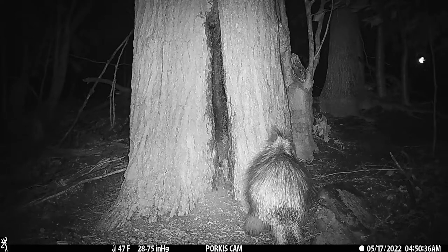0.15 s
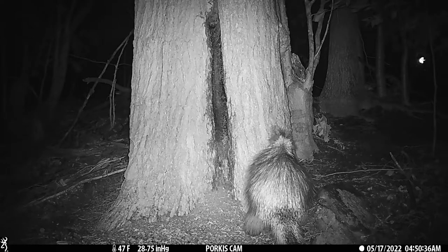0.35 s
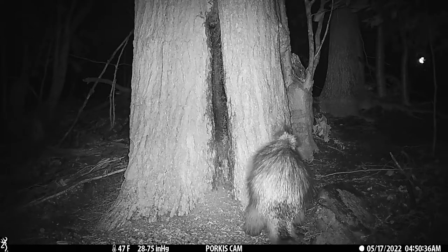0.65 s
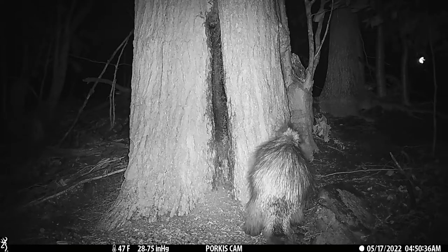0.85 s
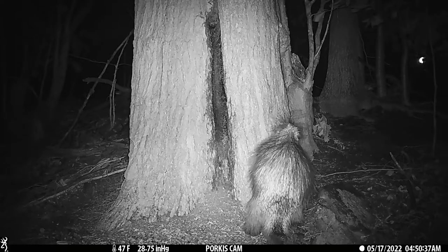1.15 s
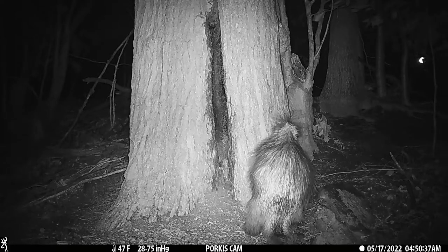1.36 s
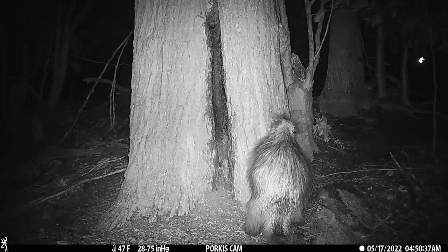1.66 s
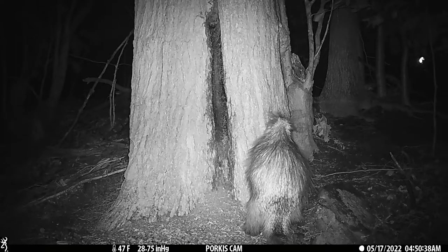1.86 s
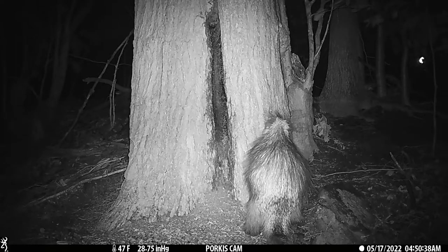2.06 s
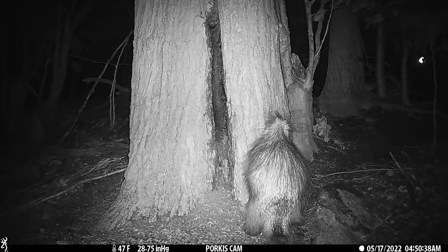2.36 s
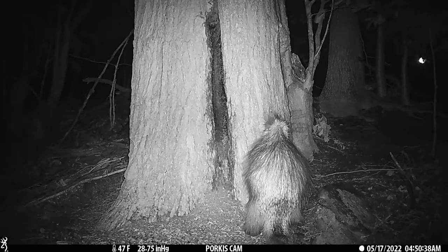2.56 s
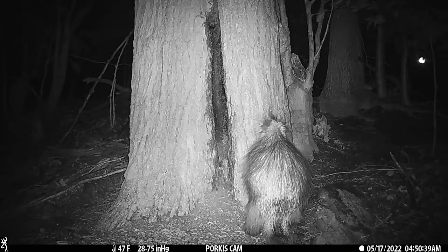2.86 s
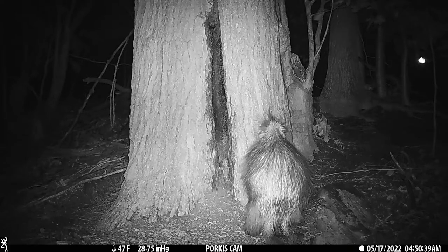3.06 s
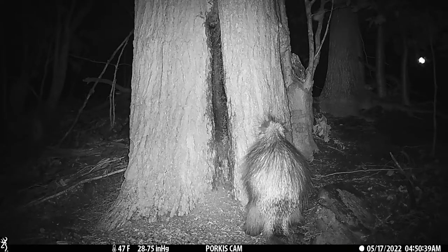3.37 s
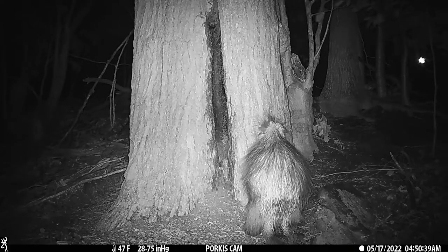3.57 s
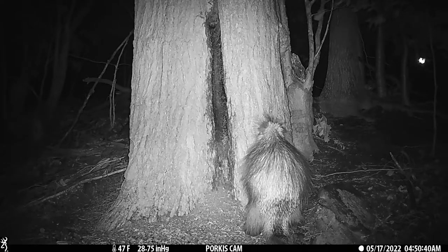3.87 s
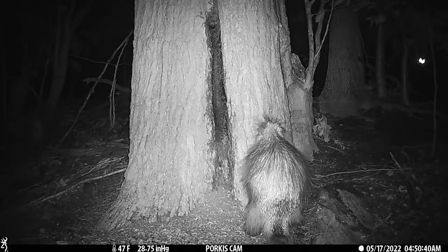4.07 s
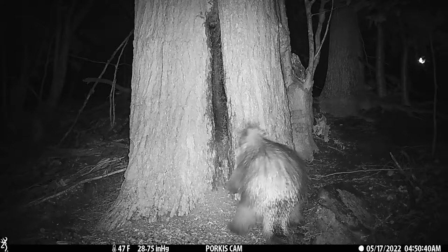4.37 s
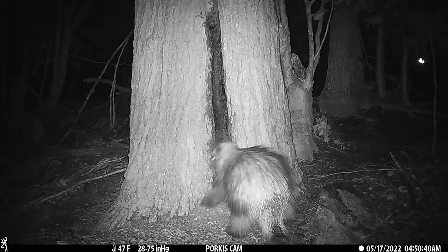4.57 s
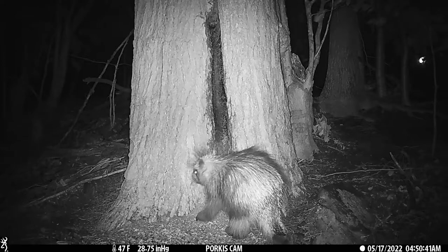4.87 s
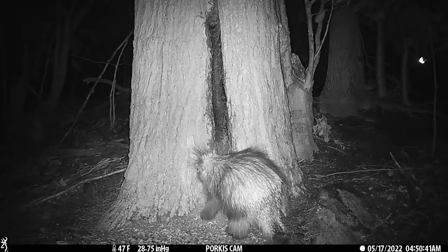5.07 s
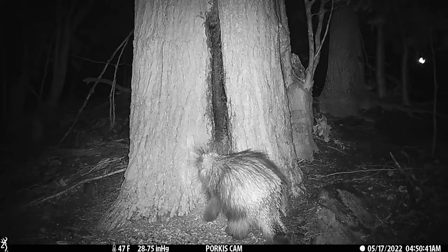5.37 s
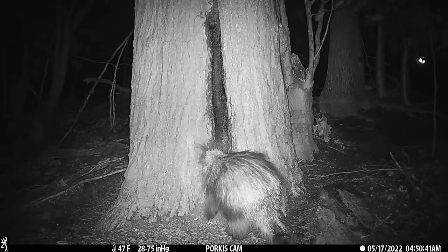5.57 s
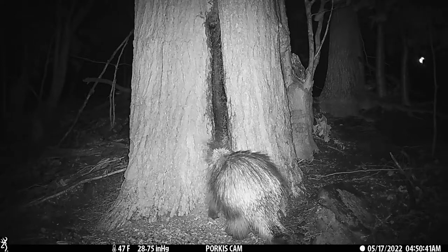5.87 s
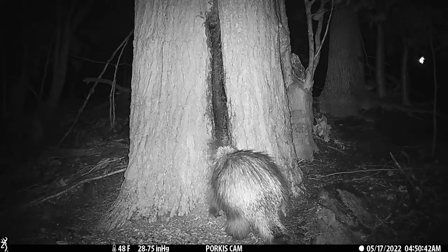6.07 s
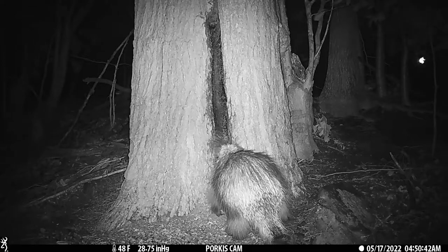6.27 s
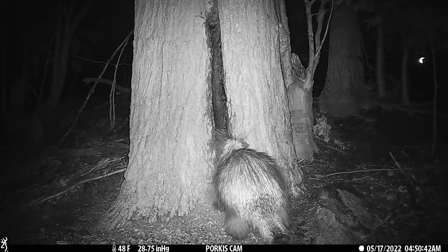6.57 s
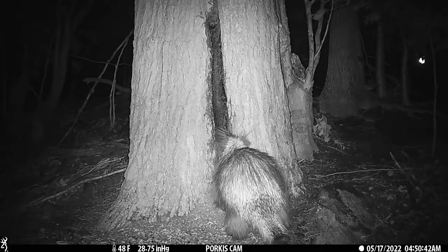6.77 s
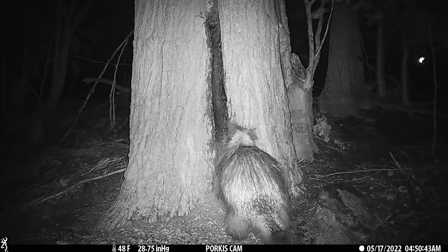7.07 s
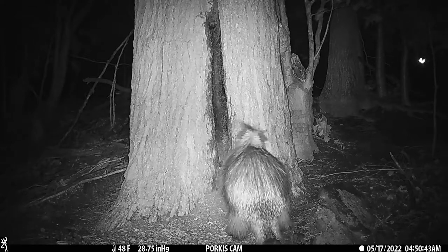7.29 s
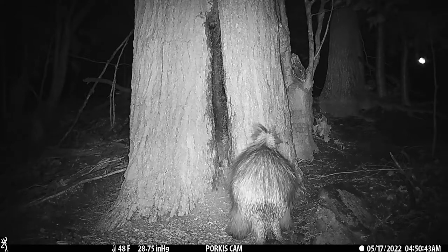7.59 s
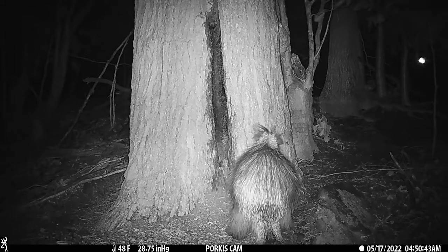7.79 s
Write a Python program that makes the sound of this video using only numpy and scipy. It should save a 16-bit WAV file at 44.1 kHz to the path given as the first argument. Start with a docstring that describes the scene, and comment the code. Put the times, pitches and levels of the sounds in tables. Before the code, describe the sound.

Repeated plaintive whining cries from a porcupine at a tree, each dropping in pitch, with camera hiss, faint whine and late wind buffeting.

```python
"""Porcupine cries at night

A porcupine whines nine times at the foot of a tree, a few metres from a trail camera. Most cries hold near
1 kHz, then slide down: harmonics of the vocal folds weighed by nose, throat and mouth, plus a chest hum.
Trunks return them as sparse decaying echoes. The camera adds shaped hiss, a jittering oscillator with locked
overtones and a gated tone. Wind is gusting low noise, with brief pressure pulses near the end."""
import sys
import numpy as np
from scipy import signal
from scipy.fft import rfft, irfft
from scipy.io import wavfile
from scipy.ndimage import uniform_filter1d

SR = 44100
rng = np.random.default_rng(int(sys.argv[2]) if len(sys.argv) > 2 else 0)


def output_pcm(signal):
    """Save a mono or channel-first signal as 16-bit PCM at the path in sys.argv[1].

    Samples are clipped to [-1, 1] before scaling.
    """
    pcm = np.clip(np.atleast_2d(signal).T, -1, 1) * 32767
    wavfile.write(sys.argv[1], SR, np.round(pcm).astype(np.int16))


N = 349713


def gain(db):
    """Logarithmic level: 20 dB is a factor of ten in amplitude."""
    return 10 ** (np.asarray(db) / 20)


def unit_rms(x):
    """Normalization of mean power: scales a signal to rms 1."""
    return x / np.sqrt(np.mean(x ** 2) + 1e-20)


def read_spectrum(points, hz, column=1):
    """Interpolation of a table along a logarithmic frequency axis."""
    table = np.transpose(points)
    return np.interp(np.log(hz + 1), np.log(table[0] + 1), table[column])


def wander(n, low_hz, high_hz, order=1):
    """Band-shaped random fluctuation of rms 1: peaks somewhat above low_hz, stops at high_hz."""
    hz = np.fft.rfftfreq(n + SR, 1 / SR)
    slope = hz / (hz ** 2 + low_hz ** 2) ** 0.76
    spectrum = rfft(rng.standard_normal(n + SR)) * (hz < high_hz) * slope ** order
    return unit_rms(irfft(spectrum, n + SR)[:n])


def add(mix, s, sound):
    """Superposition: adds a sound to the mix from time s."""
    part = mix[round(s * SR):][:len(sound)]
    part += sound[:len(part)]


# Spectral density of the hiss: f/Hz, relative level/dB per Hz
HISS_SPECTRUM = [(20, -7.5), (150, -12.5), (400, -4.5), (1000, -1), (2000, -4.5), (3200, -3.5), (5000, -2),
                 (6200, -11.5), (8200, -18), (10500, -23), (11000, -32.5), (11600, -22.5), (13200, -28.5),
                 (15700, -29)]
HISS_DB = -57.5  # rms


def hiss():
    """Filtered white noise: the smooth noise of night air and preamplifier."""
    spectrum = rfft(rng.standard_normal(N))
    spectrum *= gain(read_spectrum(HISS_SPECTRUM, np.fft.rfftfreq(N, 1 / SR)))
    return gain(HISS_DB) * unit_rms(irfft(spectrum, N))


# Slow drift of the oscillator, to which jitter is added: t/s, f/Hz
WHINE_DRIFT = [(0.0, 3780), (0.3, 3800), (0.62, 3770), (0.9, 3810), (1.06, 3650), (1.2, 3730), (1.6, 3675),
               (1.97, 3704), (2.24, 3574), (2.66, 3760), (2.96, 3590), (3.33, 3800), (3.86, 3630),
               (4.0, 3700), (4.19, 3630), (4.37, 3820), (4.72, 3470), (5.0, 3844), (5.4, 3905),
               (5.88, 3790), (6.34, 3894), (6.82, 3720), (7.22, 3850), (7.402, 3710), (7.93, 3920)]
# Overtones before the treble limit: multiple of the pitch, rms level/dB
WHINE_OVERTONES = [(1, -59), (2, -68.5), (4, -87)]
SLOW_JITTER, FAST_JITTER = 0.0118, 0.015  # rms shares of the pitch
WHINE_TOP_HZ = 14800  # overtones fade steeply above this


def whine():
    """Frequency modulation: an unsteady camera oscillator whose overtones stay phase-locked."""
    s, drift_hz = np.transpose(WHINE_DRIFT)
    jitter = SLOW_JITTER * wander(N, 4.92, 14) + FAST_JITTER * wander(N, 11.2, 300)
    hz = np.interp(np.arange(N) / SR, s, drift_hz) * (1 + jitter)
    turns = np.cumsum(hz) / SR
    tone = np.zeros(N)
    for k, db in WHINE_OVERTONES:
        partial = gain(db) * np.sqrt(2) * np.sin(2 * np.pi * k * turns)
        tone += partial / (1 + (k * hz / WHINE_TOP_HZ) ** 40)
    return tone * gain(0.4 * wander(N, 7.8, 220))


THROB_RATE_HZ, THROB_HZ, THROB_PEAK_DB = 19.986, 2515, -61  # the peak level fluctuates slightly


def throb():
    """Amplitude gating: a tone sounds for about 60 % of each 50 ms, gliding mostly upwards."""
    beat = 2 * np.pi * THROB_RATE_HZ * (np.arange(N) / SR - .0405)
    gate = np.clip(.7 + 2.2 * np.cos(beat), 0, 1)
    hz = THROB_HZ + 22 * np.sin(beat) + 32 * wander(N, 12, 50)
    fluctuation = gain(.8 * wander(N, 3, 40))
    return gain(THROB_PEAK_DB) * fluctuation * gate * np.sin(2 * np.pi * np.cumsum(hz) / SR)


# Gusts, exponential on both sides of the peak: t/s, rms level/dB, rise/s, fall/s
WIND_GUSTS = [(0.11, -63, .04, .04), (0.64, -79, .2, .04), (2.23, -79, .04, 0.13), (3.75, -76, .1, .05),
              (4.09, -73, 0.045, .1), (4.55, -74, .15, 0.039), (5.17, -63, .15, 0.05),
              (5.61, -64, 0.14, 0.17), (5.92, -60.5, 0.035, 0.21), (6.29, -65, .06, 0.54),
              (6.89, -65, .1, 0.056), (7.07, -60, 0.024, 0.047), (7.35, -55.5, 0.055, 0.18),
              (7.75, -58, 0.036, .1)]
# Pressure pulses: onset t/s, level/dB at the pulse centre, length scale/ms
WIND_PUFFS = [(7.06, -69, 0.97), (7.077, -62, 1.3), (7.189, -52, 2.3), (7.2, -49, 2.9), (7.216, -54, 3.4),
              (7.264, -54, 1.8), (7.287, -49, 1.9), (7.325, -53, 1.15), (7.332, -41, 1.8), (7.35, -49, 3.5),
              (7.357, -52, 2.2), (7.406, -41, 1.5), (7.415, -43, 2.1), (7.521, -52, 1.8)]
CALM_DB = -89.5  # rms, beneath the gusts


def wind():
    """Turbulent pressure: lumpy rumble swells with gusts, and eddies strike the port as puffs."""
    t = np.arange(N) / SR
    level = gain(CALM_DB)
    for s, db, rise, fall in WIND_GUSTS:
        level = level + gain(db) * np.exp(-abs(t - s) / np.where(t < s, rise, fall))
    rumble = wander(N, 26.7, 400, order=3)
    lumps = gain(4.45 * wander(N, 12.0, 30))
    out = level * unit_rms(rumble * lumps)
    ms_from_centre = np.arange(-600, 600) / SR * 1000
    signs = rng.choice([-1, 1], len(WIND_PUFFS))
    for (s, db, ms), sign in zip(WIND_PUFFS, signs):
        v = ms_from_centre / ms
        pulse = (1 - 3 * v - 4 * v ** 2) * np.exp(-4 * v ** 2)
        # the centre comes half a length after the onset
        add(out, s - 600 / SR + ms / 2000, sign * gain(db) * pulse)
    return out


def echoes(x, table):
    """Reverberant decay: sparse reflections of random sign, each band with its own decay time."""
    taps = np.zeros(SR // 2)
    at = np.arange(130, len(taps) - 22, 22)  # from 3 ms on, one reflection in each 0.5 ms
    taps[at + rng.integers(0, 22, len(at))] = rng.choice([-1., 1.], len(at))
    hz, t, z = signal.stft(taps, SR, nperseg=128)
    z = z * gain(-60 * t / read_spectrum(table, hz)[:, None])
    band_gain = gain(read_spectrum(table, hz, column=2))[:, None]
    tail = signal.istft(z * band_gain, SR, nperseg=128)[1]
    flat_tail = signal.istft(z, SR, nperseg=128)[1]
    return signal.fftconvolve(x, tail / np.linalg.norm(flat_tail))[:N]


# Reflections off the near trunk: f/Hz, decay time for 60 dB/s, level against the direct sound/dB
TRUNK_ECHOES = [(1500, .07, -18), (2500, .08, -8), (3500, .09, -2), (6000, .08, -2)]
# Reflections off the farther trees: f/Hz, decay time for 60 dB/s, level against the direct sound/dB
WOODS_ECHOES = [(506, 0.3, -4.5), (1730, 0.34, -10), (2710, 0.59, -8), (5300, 0.53, -4.5), (8100, 0.25, -2)]


def woods(x):
    """Reflection: the animal faces the near trunk, whose bark returns treble; farther trees add the tail."""
    return echoes(x, TRUNK_ECHOES) + echoes(x, WOODS_ECHOES)


def resonances(modes, hz, factor=1):
    """Resonance: power passed at hz by steep-skirted modes, their centres shifted by a factor."""
    power = 0
    for f, width, db in modes:
        power = power + gain(2 * db) / (1 + (2 * (hz - f * factor) / width) ** 2) ** 2.015
    return power


# Contours, one table a cry: t/s, effort level/dB, f/Hz, mouth level against the nose/dB
CRY_CONTOURS = [
    [(0.0, -40, 874, 5), (0.032, -37, 753, -2), (0.06, -43.5, 584, 2.5), (0.092, -42.5, 393, -4),
     (0.108, -77, 320, 5)],
    [(0.605, -62, 763, -14), (0.625, -55, 880, -18), (0.657, -55.5, 960, -6), (0.697, -50, 970, -4),
     (0.781, -40.5, 869, -0.5), (0.853, -40.5, 561, 1), (0.885, -41, 554, -7), (0.903, -39, 514.6, -3.5),
     (0.925, -44.5, 448, -1), (0.945, -45, 368, -7), (0.969, -70, 310, 3)],
    [(1.515, -62, 782, -8), (1.543, -56, 920, -10), (1.585, -52, 990, -5), (1.667, -45.5, 926, -1.5),
     (1.747, -40.5, 891, 1.5), (1.783, -38, 775, -1.5), (1.819, -41.5, 535, -1), (1.839, -37.5, 484, -7.5),
     (1.867, -61, 375, 5)],
    [(2.35, -70, 820, -5), (2.37, -53, 880, -13), (2.39, -57, 982, -1), (2.418, -48.5, 1026, -13.5),
     (2.55, -40.5, 1034, 0), (2.622, -38.5, 985, 2), (2.658, -34.5, 795, 0), (2.702, -38.5, 468, -4.5),
     (2.726, -40.5, 410, -2), (2.758, -68, 310, 2)],
    [(3.24, -64, 905, -11), (3.272, -52, 1022, -10), (3.308, -45, 1066, 2.5), (3.444, -39.5, 1063, 2),
     (3.52, -35, 932, -5.5), (3.54, -30.5, 876, -3.5), (3.568, -35.5, 750, 3), (3.604, -37, 490, -6),
     (3.632, -40, 410, -1), (3.676, -40.5, 424, -2.5), (3.74, -41, 369, -6), (3.784, -56.5, 295, -10)],
    [(4.345, -66, 913, 4), (4.372, -57, 993, 5), (4.384, -48.5, 1020, -9), (4.412, -48, 1045, -2),
     (4.524, -41, 1000, 9.5), (4.616, -36.5, 865, -1.5), (4.652, -38.5, 683, 2.5), (4.668, -37, 530, -8),
     (4.688, -43, 405, 0), (4.72, -58, 300, -5)],
    [(5.22, -55, 785, -7), (5.256, -55.5, 937, -9), (5.328, -47, 919, 0.5), (5.388, -41, 868, 1.5),
     (5.448, -39, 770, 0.5), (5.486, -42.5, 655, -2), (5.53, -43, 694.4, -1), (5.576, -41, 587, 1.5),
     (5.624, -39, 514, -2), (5.668, -51, 340, -6)],
    [(6.19, -60, 745, 1), (6.215, -54, 885, 0), (6.25, -57, 979, -7), (6.306, -47, 996, 2.5),
     (6.406, -43.5, 961, 0.5), (6.478, -44, 968, 4), (6.514, -38, 954, 3.5), (6.566, -40.5, 868, 3.5),
     (6.586, -35, 741, -3), (6.602, -43.5, 620, 2)],
    [(7.155, -52, 788, -6), (7.183, -54.5, 970, 6), (7.215, -50.5, 1063, -9), (7.25, -40, 1088, 14.5),
     (7.379, -35, 1103, 8.5), (7.463, -37.5, 1042, 8.5), (7.495, -34, 971, 3), (7.515, -28, 871, -7.5),
     (7.551, -37, 765, 9.5), (7.579, -38.5, 609, 1.5), (7.603, -46, 440, 1)],
]
# How each cry is held: chest hum level/dB at middle effort, hum flutter/dB,
# throat level against the mouth/dB, throat shift and mouth shift as factors
CRY_POSES = [(-61.5, 2.5, 0.5, 0.97, 1.1), (-58.5, 2, -1.5, 1.03, 1.07), (-60, 2, -2.5, 1.05, 1.056),
             (-58, 1, -1.5, 1.04, 1.057), (-56.5, -0.5, 1, 1.028, 1.044), (-57.5, 1, 1, 1.003, 1.034),
             (-61.5, 4.5, 0, 1.055, 1.09), (-63.5, 3, -3, 0.96, 1), (-58, 0.5, -2, 0.996, 1.01)]
# Resonances, with relative peak level: f/Hz, width 6 dB down/Hz, level/dB
NOSE_MODES = [(1140, 400, -41), (1608, 418, 7.5), (2220, 340, -3.5)]
THROAT_MODES = [(3614, 806, 0.5), (4235, 270, -6.5)]
MOUTH_MODES = [(4700, 910, -4.5), (5504, 1150, -5), (9070, 1800, -29.5)]
# Transmission of the body wall: f/Hz, level/dB
CHEST_WALL = [(300, -3), (450, -7), (650, 0), (850, -3.5), (1050, 2)]
SLACK_THROAT_DB, SLACK_OPENING = 2, 1.003  # every cry relaxes to this pose as the pitch drops
HUM_FOLLOW, MID_EFFORT_DB = 0.2, -43  # dB of hum per dB of effort, about this effort
HUM_RISE_S = 0.048  # the chest joins in after the voice


def cry(rows, pose):
    """Source and filter: harmonics of the folds slide through the resonances of nose, throat and mouth."""
    s, *columns = np.transpose(rows)
    t = np.arange(s[0], s[-1] + .005, 1 / SR)
    effort_db, hz, mouth_db = (
        uniform_filter1d(np.interp(t, s, c), size=400, mode="nearest") for c in columns)
    slack = np.clip((930 - hz) / 300, 0, 1)  # folds slacken as the pitch drops
    held_hum_db, flutter_db, held_throat_db, *held_shifts = pose
    hum_db = held_hum_db + HUM_FOLLOW * (effort_db - MID_EFFORT_DB) + read_spectrum(CHEST_WALL, hz)
    throat_db = mouth_db + held_throat_db + slack * (SLACK_THROAT_DB - held_throat_db)
    throat_shift, mouth_shift = (held + slack * (SLACK_OPENING - held) for held in held_shifts)

    # slack folds swing less evenly
    jitter = (.0015 + .005 * slack) * wander(len(t), 40, 400)
    turns = np.cumsum(hz * (1 + jitter)) / SR
    k = np.arange(2, 34)[:, None]
    partial_hz = k * hz
    power = resonances(NOSE_MODES, partial_hz)
    power += gain(2 * throat_db) * resonances(THROAT_MODES, partial_hz, throat_shift)
    power += gain(2 * mouth_db) * resonances(MOUTH_MODES, partial_hz, mouth_shift)
    power /= 1 + (partial_hz / 9800) ** 16  # steep fall above 9.8 kHz
    height = np.sqrt(2 * power / power.sum(axis=0))

    # five independent swells shared among the partials, deeper in the upper ones
    group = k[:, 0] % 5
    swells = np.array([wander(len(t), 8, 45) for _ in range(5)])[group]
    depth_db = .5 + 2.0 * np.clip(partial_hz / 4000, 0, 1) ** 2
    # slack folds leak air and the upper partials turn to rasp
    hoarse = np.array([wander(len(t), 90, 400) for _ in range(5)])[group]
    leak = .38 * slack * np.clip((partial_hz - 1800) / 1700, 0, 1)
    breathy = np.sqrt(1 - leak ** 2) + leak * hoarse
    waves = np.cos(2 * np.pi * k * turns - .3 * k ** 2)
    voice = (height * gain(depth_db * swells) * breathy * waves).sum(axis=0)

    # the fundamental leaves through the body wall
    hum = gain(hum_db + flutter_db * swells[0]) * np.sqrt(2) * np.cos(2 * np.pi * turns)
    under_way = s[0] == 0  # the first cry has already begun
    hum *= np.clip((t - s[0]) / HUM_RISE_S + under_way, 0, 1) ** 2
    rise = (t - s[0]) / 0.0045 + under_way
    fall = (t[-1] - t) / 0.0062
    return s[0], (gain(effort_db) * voice + hum) * np.clip(np.minimum(rise, fall), 0, 1)


def scene():
    """Superposition at one microphone, given on two equal channels."""
    animal = np.zeros(N)
    for rows, pose in zip(CRY_CONTOURS, CRY_POSES):
        add(animal, *cry(rows, pose))
    background = hiss() + whine() + throb() + wind()
    mono = gain(-1.15) * (animal + woods(animal)) + background
    return np.array([mono, mono])


NOTCH_HZ, NOTCH_WIDTH_HZ, EDGE_HZ = 5482, 330, 15730


def record(dry):
    """Cavity absorption and band limiting: the housing notches one band out, then a low-pass acts."""
    notched = signal.lfilter(*signal.iirnotch(NOTCH_HZ, NOTCH_HZ / NOTCH_WIDTH_HZ, SR), dry)
    low_pass = signal.firwin(2047, EDGE_HZ, window=("kaiser", 9), fs=SR)
    return signal.oaconvolve(notched, low_pass[None], "same")


dry = scene()
out = record(dry)
output_pcm(out)
```